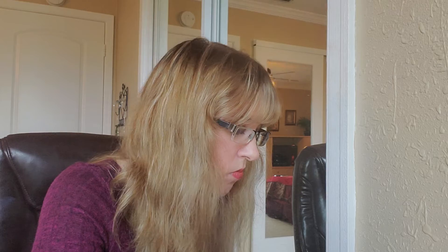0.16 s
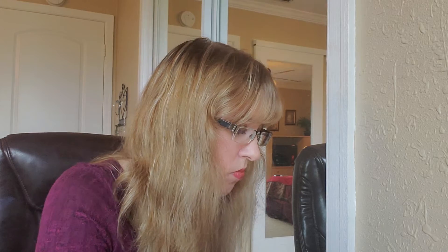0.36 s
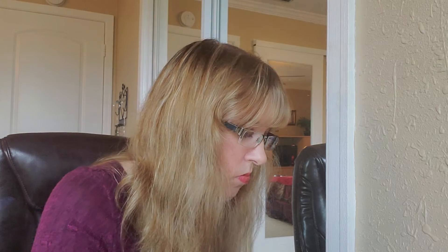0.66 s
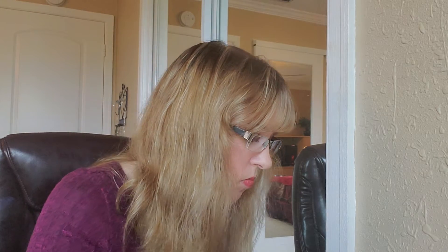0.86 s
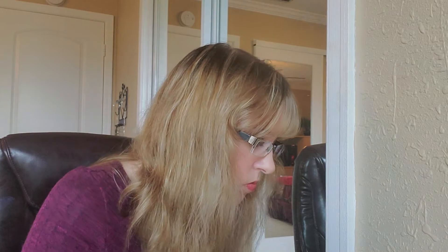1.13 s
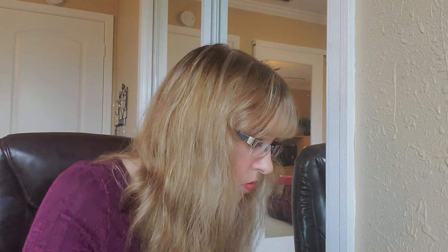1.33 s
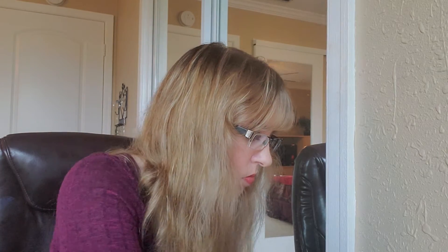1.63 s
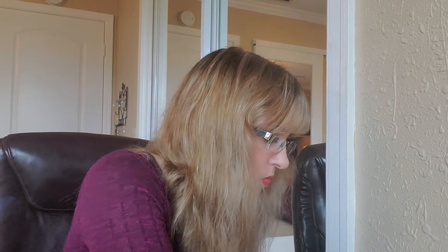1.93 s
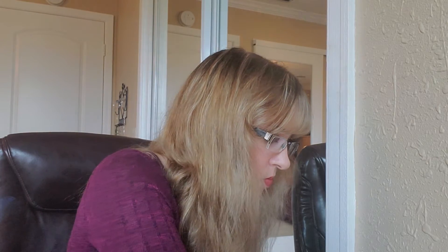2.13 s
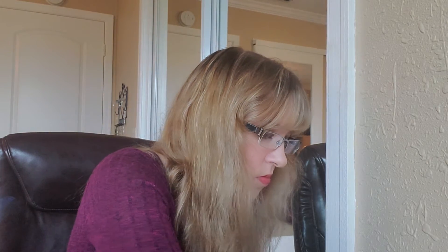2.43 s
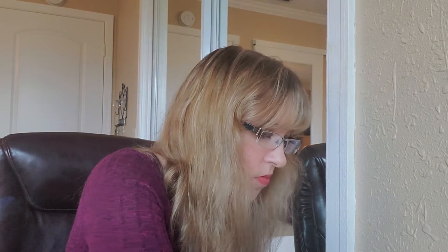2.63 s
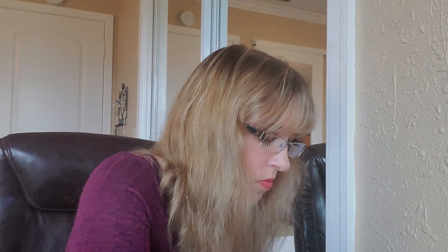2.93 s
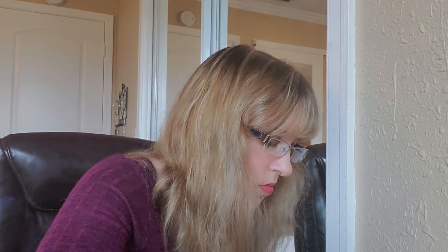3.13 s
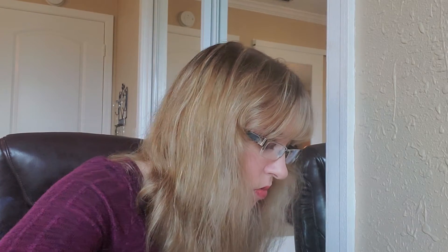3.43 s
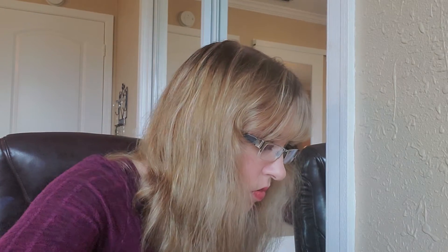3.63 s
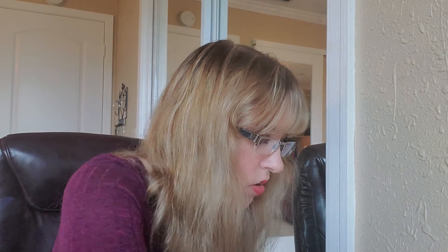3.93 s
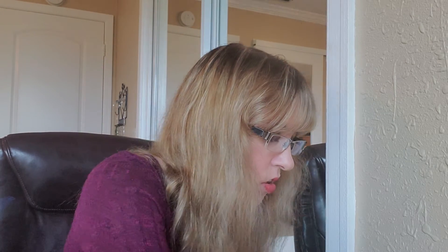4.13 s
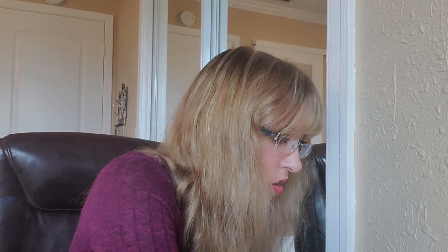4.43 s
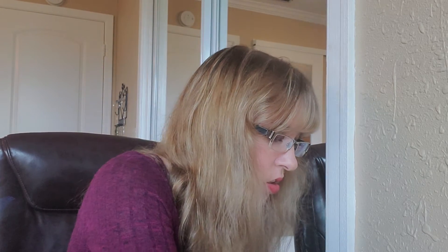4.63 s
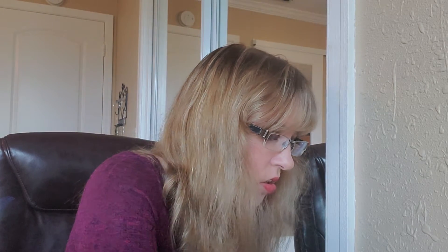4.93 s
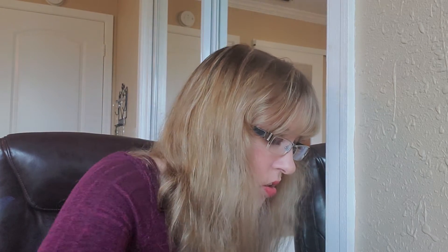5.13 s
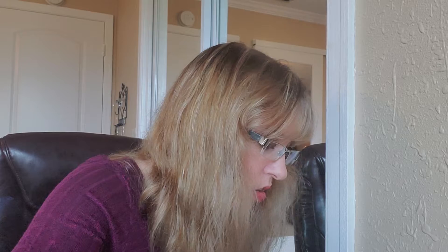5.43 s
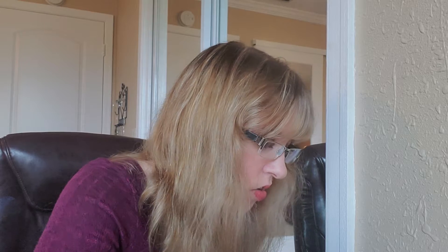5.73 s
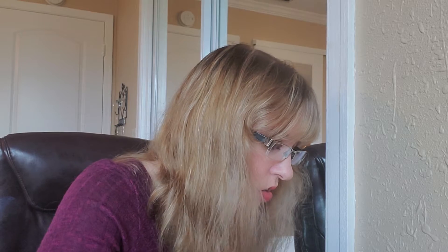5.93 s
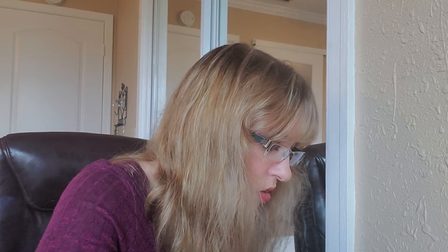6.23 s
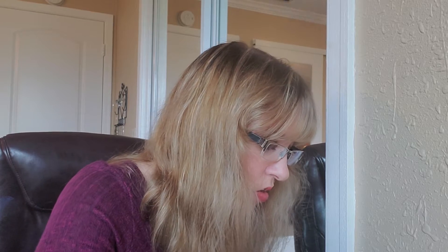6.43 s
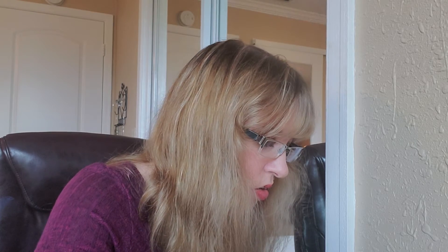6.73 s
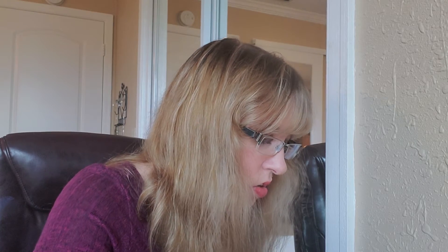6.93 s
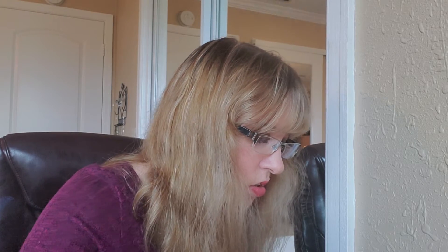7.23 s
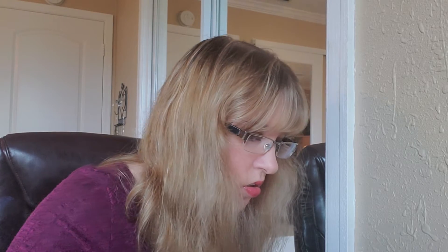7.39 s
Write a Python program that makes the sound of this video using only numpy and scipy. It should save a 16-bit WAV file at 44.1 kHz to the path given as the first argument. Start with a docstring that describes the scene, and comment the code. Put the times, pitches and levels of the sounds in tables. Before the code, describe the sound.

In a quiet room, someone turns thin book pages close to stereo microphones, slightly right of centre. From 0 to 1.3 s, short dry slides and flutters are mixed with small crackles and soft low knocks, strongest around 0.8 to 1.1 s. A brief lull follows, then lighter rustles and ticks from 1.7 to 2.6 s, with a quick crisp flick near 2.5 s. After near stillness, a sheet rustles at 3.2 to 3.5 s with sharp snaps and dull flops. Another pause leads to a busy run of swishes and crackles from 4.05 to 5.3 s, including a bright knock near 4.87 s. Only faint, thin touches remain until about 6.6 s. Rustling then grows, peaking in a loud snap and flop at 7.1 s, followed by short crisp flicks to the end. A faint low hum wavers beneath, with short room reflections.

```python
"""Leafing through thin pages

Someone turns the pages of a book a little right of the microphones in a quiet room, over a low wavering hum.
Sliding fingers and sheets are grainy friction noise, mirrored off the bending sheet into wandering notches.
Buckling sheets snap as noise bursts around one sharp crack; pages flop as damped puffs with ringing modes.
An echo and a short tail give the room; sine tones and shaped noise give the hum and air."""
import sys
import numpy as np
from scipy import signal
from scipy.fft import rfft, irfft
from scipy.io import wavfile
from scipy.ndimage import uniform_filter1d, map_coordinates

SR = 44100
rng = np.random.default_rng(int(sys.argv[2]) if len(sys.argv) > 2 else 0)


def digitize_waveform(pressure):
    """Quantize a signal to 16-bit integers and store it at the path in sys.argv[1].

    Rows of a 2-D input are taken as channels; values are limited to [-1, 1].
    """
    field = np.atleast_2d(pressure).T
    bounded = np.clip(field, -1, 1)
    quanta = np.round(bounded * 32767).astype(np.int16)
    wavfile.write(sys.argv[1], SR, quanta)


N = 333396

# low hum: (time [s], relative level [dB])
HUM_LEVEL = [(0.0, -53.5), (0.29, -67), (0.71, -55), (1.05, -73), (1.09, -51.5), (1.22, -68.5), (1.28, -63),
             (1.52, -80), (1.6, -67), (3.37, -52.5), (3.41, -62.5), (5.01, -60.5), (5.14, -52),
             (7.05, -62.5), (7.31, -80), (7.56, -50)]
# faint companion tones of the hum: (frequency [Hz], level [dB])
HUM_LINES = [(99, -72.5), (180, -73), (300, -83.5)]
# spectrum of still air: (frequency [Hz], relative density [dB per Hz])
AIR_SPECTRUM = [(20, -34), (40, -6), (60, -1.5), (85, -10.5), (130, -12.5), (180, -22.5), (240, -27),
                (300, -26), (400, -37.5), (700, -42.5), (3000, -45.5), (7000, -49.5), (16000, -43.5)]
# sliding or swinging sheets: (start [s], length [s], rustle halfway [dB], swell over the stroke [dB],
# flutter re rustle [dB], fibre hiss re rustle [dB])
STROKES = [(0, .035, -49.5, -13, 4.5, -7.5), (0.054, 0.098, -65.5, 13, -1, -5),
           (0.16, 0.11, -73.5, 14, -3, 3.5), (0.249, 0.21, -59.5, 1.5, 3.5, -1.5),
           (0.504, .16, -56.5, 4, 4.5, -1.5), (0.672, 0.22, -56, -3.5, -3, -3.5),
           (0.974, .19, -51.5, 4.5, 0.5, -3.5), (1.193, 0.018, -57.5, 5, -5, -1),
           (1.737, 0.081, -63, 7, -2, -3), (1.865, 0.088, -63, 9, 1, -7), (1.994, 0.048, -51.5, 5.5, 1, -6),
           (2.087, 0.13, -55.5, 13, 2.5, 3), (2.226, 0.14, -55.5, -6, -0.5, -4),
           (2.407, 0.069, -66.5, 15, -10, 0), (2.479, 0.069, -46, 17.5, -10.5, -4.5),
           (2.584, 0.19, -75.5, 4, -9, 1.5), (2.96, 0.13, -72.5, -5, 0.5, 1),
           (3.078, 0.16, -71.5, 3, 11, 1), (3.205, .29, -49.5, 3.5, -2.5, -6.5),
           (4.049, 0.088, -57.5, 14.5, 0, -0.5), (4.164, 0.13, -55, 3, 2.5, -7),
           (4.318, 0.092, -47.5, 16.5, 0.5, -6), (4.456, 0.062, -52.5, -11.5, 5, -2),
           (4.527, 0.06, -51.5, 13, -6, -0.5), (4.593, 0.23, -54, -1.5, -1, -6.5),
           (4.866, 0.026, -45, 3.5, -1.5, -20), (4.946, 0.011, -54, 6.5, -0.5, -2.5),
           (5.023, 0.042, -48.5, 9.5, 4.5, -9), (5.094, 0.057, -45.5, -8.5, 4.5, -17),
           (5.146, 0.094, -51, -3, -4.5, -0.5), (5.265, 0.016, -47, -6.5, -33, -21),
           (5.693, 0.039, -79.5, -3, -5, 3), (5.859, 0.11, -66.5, 9, -16, 4),
           (6.089, 0.017, -74, -6, -18, 3), (6.239, 0.023, -61.5, 1, -24, 7),
           (6.288, .08, -61, -3, -37, 1.5), (6.625, 0.14, -81, -5, -10, 9.5),
           (6.758, 0.045, -59, 4, -15, -3.5), (6.829, 0.11, -49.5, -5, -4, -3),
           (6.972, 0.13, -44.5, 17.5, -8.5, -2), (7.091, 0.085, -42, -7, -2, -24),
           (7.31, 0.028, -46, 9, -3.5, -12), (7.355, 0.074, -51, 6, -2.5, -8),
           (7.499, 0.037, -42, 6, -12.5, -2)]
# after the hand lets go: flutter, rustle, hiss [dB/s]
RELEASE_DB_PER_S = [297, 300.5, 326]
# held page, barely stirring: flutter, rustle, hiss [dB]
RESTING_DB = [-88.5, -90, -87.5]
# flutter gives way to rustle between the first two, rustle to hiss between the last two: (frequency [Hz])
REGISTERS_HZ = [740, 1300, 4000, 7500]
# colour of sliding paper: (frequency [Hz], relative density [dB per Hz])
PAPER_COLOUR = [(150, 3.5), (300, 8.5), (500, 11.5), (800, 5), (1300, 5.5), (2000, 4.5), (3000, 4.5),
                (4200, 3.5), (5900, 3), (8200, 5.5), (14000, 2.5)]
# left-right likeness of the sliding sound: (frequency [Hz], likeness [0..1])
LIKENESS = [(200, 0.94), (1000, 0.77), (3000, 0.49), (15000, 0.079)]
# sheet buckles: (time [s], relative crack [dB], relative body [dB], relative crispness [dB], crumple t60 [s])
SNAPS = [(0.0152, -46, -54, -68, 0.022), (0.0334, -36, -35.5, -81, .025), (0.2951, -34, -64, -70, 0.02),
         (0.3412, -42, -41.5, -54, 0.07), (0.4247, -35, -34.5, -43.5, 0.051),
         (0.9876, -28.5, -31.5, -42, 0.014), (1.0638, -23, -28.5, -80, 0.017),
         (1.2475, -31, -35.5, -97, 0.036), (1.255, -27, -30.5, -96, 0.012), (1.427, -92, -92, -64, .03),
         (1.4487, -90, -84.5, -63.5, 0.046), (1.919, -44.5, -69, -55, 0.038),
         (1.985, -37, -64, -49.5, 0.055), (2.0079, -35, -51, -49, 0.044), (2.1075, -45, -47, -46, 0.049),
         (2.1265, -33.5, -48, -78, 0.029), (2.159, -49, -40, -35, 0.014), (2.167, -28, -38, -54, 0.03),
         (2.2638, -39.5, -63, -55.5, 0.041), (2.5518, -33.5, -43, -26, 0.055),
         (2.961, -52.5, -89, -58, .04), (3.2496, -22.5, -33, -37, 0.02), (3.3576, -20, -40.5, -34, 0.035),
         (3.391, -31.5, -66, -56, 0.023), (3.476, -28, -43, -34.5, 0.056), (4.2617, -35.5, -48, -34, 0.09),
         (4.407, -32, -38, -39.5, 0.012), (4.4144, -31, -53, -33.5, 0.039), (4.816, -33, -45.5, -40, .036),
         (4.87, -30.5, -35.5, -53.5, 0.02), (5.1003, -24, -46, -61.5, 0.093),
         (5.237, -33.5, -70, -63.5, 0.018), (5.275, -49, -62, -61, 0.024), (5.438, -84, -70, -58, .036),
         (5.9843, -68, -71, -38.5, 0.02), (6.6274, -67, -79, -46.5, 0.059), (6.8237, -32, -77, -35.5, .025),
         (6.841, -32, -68, -42, 0.019), (6.8901, -29, -46, -33.5, 0.019), (6.9215, -24, -52, -39.5, 0.015),
         (7.008, -35.5, -68, -41, .025), (7.1212, -18, -23, -27, 0.038), (7.26, -27, -42.5, -50, 0.034),
         (7.412, -35, -38, -33.5, 0.015), (7.514, -51, -40.5, -37, 0.032)]
# range of the crack: (edge [Hz])
CRACK_BAND_HZ = [880, 4400]
# pages and fingers knock on the book: (time [s], level [dB], pitch [Hz])
FLOPS = [(0.294, -35.5, 410), (.424, -36.5, 510), (.7956, -24, 790), (0.9894, -20.5, 790),
         (1.065, -24, 420), (1.091, -30, 317), (1.097, -42, 100), (1.2461, -27, 233), (1.2545, -26.5, 332),
         (2.871, -45.5, 257), (2.899, -44.5, 153), (3.232, -33, 258), (3.430, -33, 313), (3.4977, -26, 211),
         (4.871, -20.5, 1320), (7.1252, -24, 430), (7.129, -42, 124)]
# ringing of book and desk: (frequency [Hz], relative level [dB], t60 [s])
DESK_MODES = [(140.8, 12.5, 0.25), (238, 3.5, .11), (272.3, 0, 0.35), (337, 8, 0.027), (435, -10.5, 0.38),
              (604, -17, 0.091)]
# shading of the left microphone: (frequency [Hz], right minus left [dB])
SHADE = [(200, 3), (700, 2.5), (2400, 7), (4400, 5), (8000, 9.5), (15000, 7)]
# room decay: (frequency [Hz], t60 [s])
ROOM_T60 = [(150, 0.09), (1000, 0.2665), (4000, 0.2238), (15000, 0.61)]
# room tail: (frequency [Hz], relative reverberation level [dB])
ROOM_LEVEL = [(150, -9.5), (1000, -6), (4000, -9), (15000, -15.5)]
# microphone colour, with a step in the treble: (frequency [Hz], gain [dB])
MICROPHONE = [(20, -15.5), (50, 1.5), (7000, 2.5), (7400, -6.5), (9500, -3.5), (14000, -1)]
# bands for sliding and room tail: (edge [Hz])
BAND_EDGES_HZ = [130, 250, 400, 630, 1000, 1600, 2500, 3600, 5000, 7100, 9500, 12500, 17000]

TIME = np.arange(N) / SR
HZ = np.arange(N // 2 + 1) * SR / N
HUM_HZ, AIR_DB = 59.3, -66
GRIP_S, GRIP_DB = .018, 16  # every stroke takes hold quickly
MIRROR_S, MIRROR_SWING, MIRROR_DB = 0.000705, 0.32, -9.5  # swing: spread of the log delay
FIRST_CRACK_SHARE = 0.091  # of a snap's energy
# limp snaps crack dull, crisp ones bright: slope, and more per dB of crispness over crack
CRACK_SLOPE_DB_PER_OCTAVE, SLOPE_PER_CRISP_DB = 0.5, 0.086
PUFF_CYCLES = 7.4  # to fall 60 dB, so deep puffs last longer
RIGHT_LEAD_S = .00027
ECHO_S, ECHO_DB = 0.0075, -15
CUTOFF_HZ = 16000


def from_db(db):
    """Decibels to amplitude gain."""
    return np.exp(np.asarray(db) * (np.log(10) / 20))


def rms_one(x):
    """Scale to unit power."""
    return x / np.sqrt(np.mean(x ** 2) + 1e-20)


def at_hz(points, hz):
    """Read a table on a log-frequency axis."""
    table_hz, value = np.transpose(points)
    return np.interp(np.log(hz + 1e-9), np.log(table_hz), value)


def drift(per_s):
    """Smooth random motion of unit RMS: random knots, joined and rounded."""
    knots = rng.standard_normal(2000)
    joined = np.interp(TIME * per_s, np.arange(len(knots)), knots)
    return rms_one(uniform_filter1d(joined, max(1, int(SR / per_s))))


def bands():
    """Centre [Hz], width [Hz] and filter of each band."""
    for low, high in zip(BAND_EDGES_HZ, BAND_EDGES_HZ[1:]):
        sos = signal.butter(2, [low, high], "band", fs=SR, output="sos")
        yield np.sqrt(low * high), high - low, sos


def delayed(x, s):
    """The same sound, later."""
    return np.pad(x, (int(abs(s) * SR + .5), 0))[:N]


def background(waver_db, hum_db):
    """Wavering sine tones, and air noise whose long waves reach both microphones alike."""
    level_db = np.interp(TIME, *np.transpose(HUM_LEVEL))
    hum = 0
    for hz, db in [(HUM_HZ, level_db + hum_db)] + list(HUM_LINES):
        tone = np.sin(2 * np.pi * (hz * TIME + rng.random()))
        hum = hum + tone * from_db(db + waver_db * drift(4.4))
    white = rfft(rng.standard_normal((3, N)))
    shared = 1 / (1 + (HZ / 700) ** 2)
    pair = np.sqrt(shared) * white[2] + np.sqrt(1 - shared) * white[:2]
    air = irfft(pair * from_db(at_hz(AIR_SPECTRUM, HZ)), N)
    return (hum + from_db(AIR_DB) * rms_one(air)) * from_db([[-1.1], [1.1]])


def strokes():
    """Flutter, rustle and hiss in dB: each stroke grips, swells or eases while it lasts, and is released."""
    power = from_db(np.array(RESTING_DB))[:, None] ** 2 * np.ones(N)
    release = np.array(RELEASE_DB_PER_S)[:, None]
    for start, length, db, swell, flutter, hiss in STROKES:
        span = slice(max(0, int(start * SR) - SR // 20), int((start + length + .5) * SR))
        t = TIME[span] - start
        held = db + swell * (np.clip(t / length, 0, 1) - .5)
        grip = GRIP_DB * np.maximum(1 - t / GRIP_S, 0) ** 2
        shape = held - grip - release * np.maximum(t - length, 0)
        power[:, span] += from_db(shape + np.array([[flutter], [0], [hiss]])) ** 2
    return 10 * np.log10(power)


def friction(catches_per_s, spread_db, grain_share):
    """Fibres catch and let go: ticks of uneven size over a smooth hiss."""
    sizes = from_db(spread_db * np.minimum(rng.exponential(1, N), 4)) * rng.choice([-1, 1], N)
    ticks = rms_one(sizes * (rng.random(N) < catches_per_s / SR))
    share = np.clip(grain_share, 0, 1)
    return np.sqrt(share) * ticks + np.sqrt(1 - share) * rng.standard_normal(N)


def sliding(judder_db, patchy_db, clump_db, crinkle_db, colour_db):
    """Sheet slides on sheet; the pressure judders, and the bending page crinkles in small clumps."""
    flutter, rustle, hiss = strokes()
    crinkle = friction(catches_per_s=450, spread_db=5.5, grain_share=0.98)
    crinkle = rms_one(crinkle * from_db(clump_db * drift(40)))
    grains = [friction(catches_per_s=3000, spread_db=2.5, grain_share=0.6) for _ in range(2)]
    scatter = rng.standard_normal((2, N))
    judder = judder_db * drift(150)
    out = np.zeros((2, N))
    for k, (hz, width_hz, sos) in enumerate(bands()):
        to_rustle = np.interp(hz, REGISTERS_HZ[:2], [0, 1])
        to_hiss = np.interp(hz, REGISTERS_HZ[2:], [0, 1])
        bend = drift(45)  # the sheet's resonances shift as it bends
        level_db = flutter + to_rustle * (rustle - flutter) + to_hiss * (hiss - rustle)
        level_db = level_db + at_hz(PAPER_COLOUR, hz) + judder + patchy_db * bend
        crinkle_gain = from_db(crinkle_db + colour_db * bend)
        mid = rms_one(signal.sosfilt(sos, grains[k % 2] + crinkle * crinkle_gain))
        side = rms_one(signal.sosfilt(sos, scatter[k % 2]))
        alike = np.clip(at_hz(LIKENESS, hz), 0, 1)
        pair = np.sqrt(1 + alike) * mid + np.sqrt(1 - alike) * side * [[1], [-1]]
        out += from_db(level_db) * np.sqrt(width_hz / SR) * pair
    return out


def mirrored(pair):
    """A reflection off the bending sheet, over a changing path, makes notches wander through the rustle."""
    lag_s = MIRROR_S * np.exp(MIRROR_SWING * drift(9))
    gain = from_db(MIRROR_DB)
    back = np.array([map_coordinates(side, [(TIME - lag_s) * SR]) for side in pair])
    return (pair + gain * back) / np.sqrt(1 + gain ** 2)


def snaps(body_db, crack_db, crisp_db, spread_db, scatter_share, build_share):
    """Creases build up to one sharp crack, then die away over the sheet; long crumples build longer."""
    lead = SR // 100
    t = TIME[:SR // 10] - lead / SR
    drive = np.zeros((3, 2, N + len(t)))  # body, crack, crispness
    apart, share = np.clip([scatter_share, FIRST_CRACK_SHARE], 0, 1)
    crack_hz = np.clip(np.arange(len(t) // 2 + 1) * SR / len(t), *CRACK_BAND_HZ)
    octaves = np.log2(crack_hz / np.sqrt(np.prod(CRACK_BAND_HZ)))
    for s, crack, body, crisp, t60 in SNAPS:
        noise = rng.standard_normal((4, len(t)))
        shape_db = 60 * np.minimum(t / build_share, -t) / max(t60, .003)
        creases = np.sqrt(apart) * noise[:2] + np.sqrt(1 - apart) * noise[2]
        creases = creases * from_db(spread_db * noise[3] + shape_db)
        burst = creases * np.sqrt(2 * (1 - share) / np.sum(creases ** 2))
        burst[:, lead] -= np.sqrt(share)  # the first crack
        slope_db = CRACK_SLOPE_DB_PER_OCTAVE + SLOPE_PER_CRISP_DB * (crisp - crack)
        tilted = irfft(rfft(burst) * from_db(slope_db * octaves), len(t))
        gains = from_db([body + body_db, crack + crack_db, crisp + crisp_db])
        at = int(s * SR) - lead
        drive[:, :, at:at + len(t)] += gains[:, None, None] * np.array([burst, tilted, burst])
    out = 0
    for edges_hz, part in zip([(240, 820), CRACK_BAND_HZ, (4700, 19000)], drive):
        sos = signal.butter(4, edges_hz, "band", fs=SR, output="sos")
        out = out + signal.sosfilt(sos, part[:, :N])
    return out


def flops(desk_db, swell_s):
    """A landing page pushes out a quickly damped puff of air and sets book and desk ringing."""
    t = TIME[:SR // 2]
    out = np.zeros(N + len(t))
    for s, db, hz in FLOPS:
        puff_fade = from_db(-60 * t * hz / PUFF_CYCLES) * (1 - np.exp(-3 * hz * t))
        blow = np.sin(2 * np.pi * hz * t) * puff_fade
        for mode_hz, mode_db, mode_t60 in DESK_MODES:
            reach = (2 / (mode_hz / hz + hz / mode_hz)) ** 2  # modes near the puff's pitch take up most
            ring = np.sin(2 * np.pi * (mode_hz * t + rng.random()))
            ring = ring * from_db(desk_db + mode_db - 60 * t / mode_t60)
            blow += reach * ring * (1 - np.exp(-t / swell_s))
        at = int(s * SR)
        out[at:at + len(t)] += from_db(db) * blow
    return out[:N]


def room(pair):
    """The right microphone is nearer and less shaded; a nearby surface echoes, with a short tail."""
    tilt_db = at_hz(SHADE, HZ) / 2
    left, right = irfft(rfft(pair) * from_db([-tilt_db, tilt_db]), N)
    direct = np.array([delayed(left, RIGHT_LEAD_S), right])
    out = direct + from_db(ECHO_DB) * np.array([delayed(side, ECHO_S) for side in direct])
    t, tail = TIME[:SR // 2], 0
    for hz, _, sos in bands():
        noise = rng.standard_normal((3, len(t)))
        shared = 1 / (1 + (hz / 1000) ** 2)  # long waves reach both microphones alike
        noise = np.sqrt(shared) * noise[2] + np.sqrt(1 - shared) * noise[:2]
        fade = from_db(-60 * t / at_hz(ROOM_T60, hz)) * np.clip(t / 0.0034, 0, 1)
        fade = fade / np.sqrt(np.sum(fade ** 2))
        tail = tail + from_db(at_hz(ROOM_LEVEL, hz)) * signal.sosfilt(sos, noise) * fade
    return out + signal.fftconvolve(pair, tail, axes=1)[:, :N] * from_db([[-.6], [.6]])


def scene():
    """Paper in the room over the background."""
    rustle = sliding(judder_db=2.0, patchy_db=1.5, clump_db=-0.5, crinkle_db=-4, colour_db=2.0)
    hits = snaps(body_db=30, crack_db=18.5, crisp_db=25.5,
                 spread_db=6.0, scatter_share=0.73, build_share=0.23)
    hits = hits + flops(desk_db=-29.5, swell_s=0.001)
    return room(mirrored(rustle) + hits) + background(waver_db=2.46, hum_db=1.5)


def record(dry):
    """The microphone colours the sound and the top is cut steeply."""
    coloured = irfft(rfft(dry) * from_db(at_hz(MICROPHONE, HZ)), N)
    return signal.sosfilt(signal.ellip(10, .2, 75, CUTOFF_HZ, fs=SR, output="sos"), coloured)


dry = scene()
out = record(dry)
digitize_waveform(out)
```